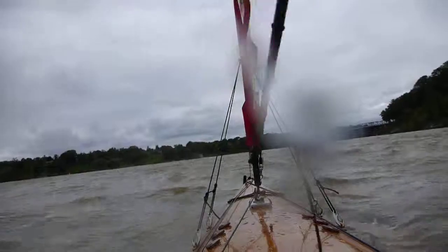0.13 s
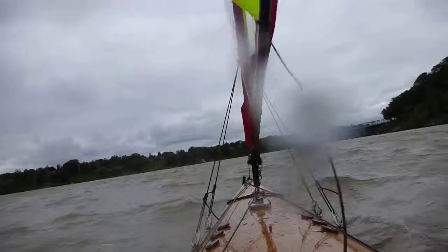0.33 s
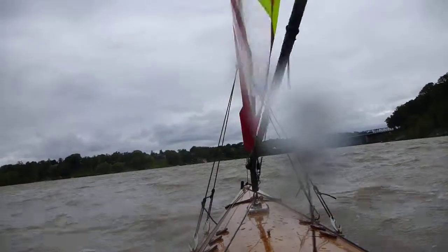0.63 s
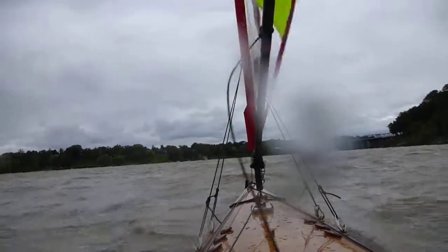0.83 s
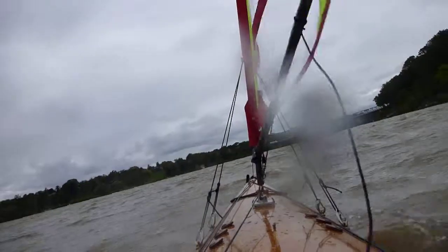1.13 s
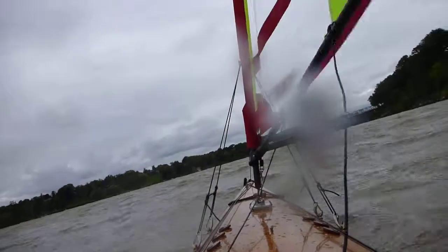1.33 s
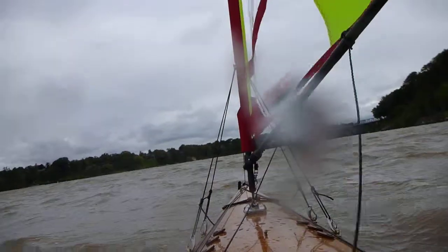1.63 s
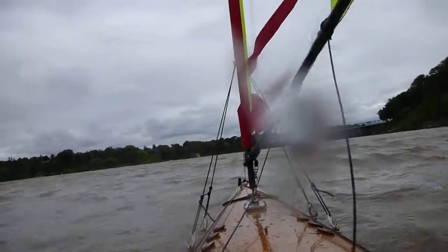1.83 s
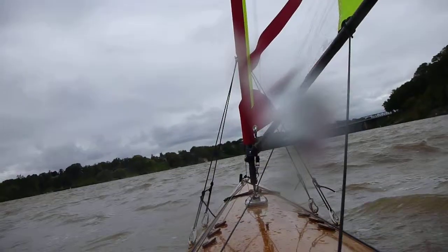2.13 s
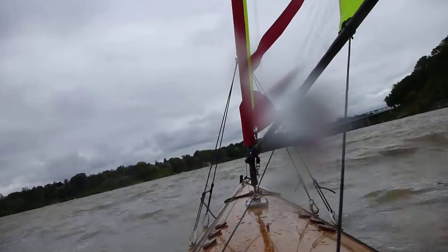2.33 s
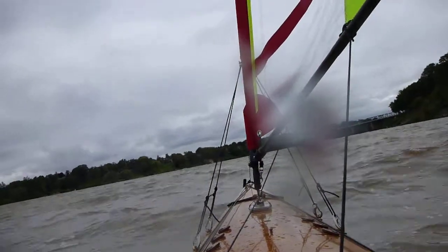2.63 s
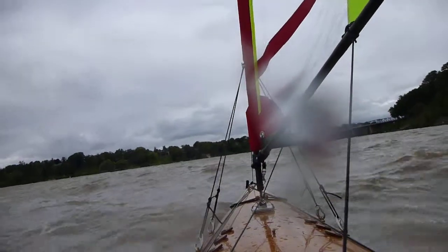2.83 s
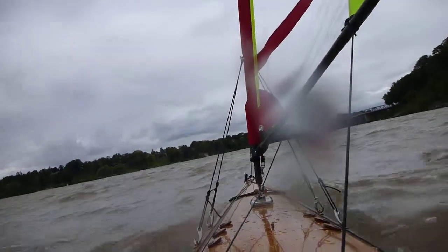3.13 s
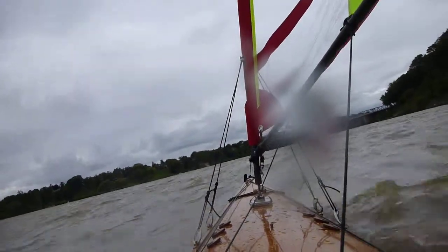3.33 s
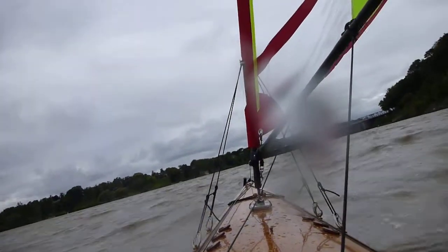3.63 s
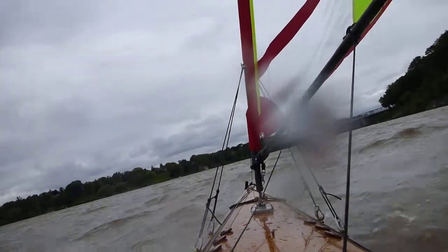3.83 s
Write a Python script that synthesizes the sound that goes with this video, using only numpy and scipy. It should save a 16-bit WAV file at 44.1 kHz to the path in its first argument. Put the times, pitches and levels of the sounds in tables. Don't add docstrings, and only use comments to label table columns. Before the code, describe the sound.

Close, rough wind thumps on a small boat's open microphone, with early sharp cloth flaps from a luffing sail, dull chop on planking and hissing water, ending in a strong sustained gust on a choppy river.

```python
import sys
import numpy as np
from scipy import signal
from scipy.io import wavfile
from scipy.ndimage import uniform_filter1d

SR = 44100
rng = np.random.default_rng(int(sys.argv[2]) if len(sys.argv) > 2 else 0)


def dump_mix(stems):
    frames = np.atleast_2d(stems).T
    limited = np.clip(frames, -1, 1)
    pcm = np.round(limited * 32767).astype(np.int16)
    wavfile.write(sys.argv[1], SR, pcm)


def ratio_of_db(decibels):
    return 10 ** (np.asarray(decibels, float) / 20)


N = 176400


def unit_power(x):
    return x / np.sqrt(np.mean(x ** 2) + 1e-20)


def in_time(rows):
    return np.interp(np.arange(N) / SR, *np.transpose(rows))


def bandpass(x, order, low_hz, high_hz):
    return signal.sosfilt(signal.butter(order, [low_hz, high_hz], "band", fs=SR, output="sos"), x)


def drift(rate_hz):
    step = 20
    r = np.exp(-2 * np.pi * rate_hz * step / SR)
    slow = signal.lfilter([1], [1, -2 * r, r * r], rng.standard_normal(N // step + 2002))
    slow = unit_power(slow[2000:])
    return np.interp(np.arange(N) / step, np.arange(len(slow)), slow)


def swell(start, length, fall_s):
    t = np.arange(N) / SR - start
    rise = np.clip(t / (0.2 * length), 0, 1)
    return rise * np.exp(-np.maximum(t - length, 0) / fall_s)


def grains(per_s, spread_db):
    sizes = ratio_of_db(spread_db * np.minimum(rng.exponential(1, N), 4))
    sizes = sizes * rng.choice([-1, 1], N)
    return unit_power(sizes * (rng.random(N) < per_s / SR))


def bands(source, gain_at, patchy_db, rate_hz):
    edges = 25 * 2 ** np.arange(0, 8.4, 1 / 3)
    out = 0
    for k, (low, high) in enumerate(zip(edges, edges[1:])):
        gain = gain_at(np.sqrt(low * high)) * ratio_of_db(patchy_db * drift(rate_hz))
        out = out + (-1) ** k * bandpass(source, 2, low, high) * gain
    return out


def colour(points):
    hz, db = np.transpose(points)
    return lambda f: ratio_of_db(np.interp(np.log(f), np.log(hz), db))


def hull():
    drum = bandpass(rng.standard_normal(N), 2, 74.4, 260)
    return ratio_of_db(-47 + 3.2 * drift(36)) * unit_power(drum)


# time in seconds, level in dB.
FLOW_LEVEL = [(0, -68.5), (.14, -59), (.3, -49.5), (.5, -74.5), (.54, -64.5), (.62, -58), (.93, -56.5),
              (1.12, -63.5), (1.4, -62), (1.58, -61), (1.635, -67.5), (1.72, -61.5), (1.93, -57),
              (2.61, -56), (2.85, -58.5), (3.11, -65), (3.5, -67), (4, -63)]
# frequency in Hz, density in dB per Hz.
WATER_COLOUR = [(120, -40.5), (200, -29), (309, -29.5), (344, -5.5), (424, -8), (1050, -7), (3710, -23.5),
                (7300, -40.5), (9490, -72), (16100, -120)]


def water():
    level_trim_db, spray_db = 16.5, -17
    drops_per_s, ring_cycles, pitches = 70, 30, 12
    gain_at = colour(WATER_COLOUR)
    rush = bands(rng.standard_normal(N), gain_at, patchy_db=1.8, rate_hz=20)
    rush = rush * ratio_of_db(2.0 * drift(60))
    clicks = grains(drops_per_s, spread_db=3.0)
    dealt = rng.integers(0, pitches, N)
    spray = 0
    for k, hz in enumerate(np.geomspace(1200, 6000, pitches)):
        r = ratio_of_db(-60 * hz / ring_cycles / SR)
        turn = 2 * np.pi * hz / SR
        drops = clicks * (dealt == k) + 1e-18
        ring = signal.lfilter([np.sin(turn)], [1, -2 * r * np.cos(turn), r * r], drops)
        spray = spray + ring * gain_at(hz) * np.sqrt(hz)
    flow = ratio_of_db(in_time(FLOW_LEVEL) + level_trim_db)
    return flow * (unit_power(rush) + ratio_of_db(spray_db) * unit_power(spray))


# crest in seconds, peak in dB, pitch in Hz.
STRONG_EDDIES = [(0.064, -38, 294), (0.221, -38, 645), (0.255, -24.5, 660), (0.481, -17.5, 1120),
                 (0.518, -19.5, 392), (0.53, -27, 353), (0.543, -19, 633), (0.555, -22.5, 347),
                 (0.594, -27, 376), (0.601, -23.5, 398), (0.683, -20.5, 1470), (0.734, -16.5, 1090),
                 (0.74, -14, 1230), (0.771, -17.5, 735), (0.82, -21.5, 417), (0.89, -30, 364),
                 (0.966, -23.5, 320), (1.087, -15.5, 385), (1.094, -14, 596), (1.099, -21, 464),
                 (1.198, -17, 562), (1.205, -14.5, 770), (1.213, -21.5, 540), (1.319, -30, 1580),
                 (1.479, -30, 1000), (1.55, -24.5, 300), (1.605, -24, 420), (1.614, -27, 500),
                 (1.696, -28, 330), (1.94, -33, 400), (1.984, -28, 290), (2.017, -24, 400),
                 (2.027, -15.5, 730), (2.032, -13.5, 550), (2.059, -17, 490), (2.07, -14, 387),
                 (2.151, -6.5, 483), (2.157, -20, 500), (2.185, -11.5, 620), (2.197, -8, 530),
                 (2.215, -14.5, 650), (2.578, -22, 390), (2.595, -22, 720), (2.693, -25, 332),
                 (2.875, -30.5, 318), (2.955, -23, 260), (3.01, -17.5, 340), (3.052, -24, 370)]
# crest in seconds, peak in dB, pitch in Hz.
CLOSING_EDDIES = [(3.153, -25.5, 396), (3.168, -14, 280), (3.203, -11, 440), (3.214, -13, 510),
                  (3.229, -14.5, 556), (3.243, -29, 530), (3.265, -10, 350), (3.288, -11.5, 740),
                  (3.3, -20, 760), (3.31, -9, 754), (3.321, -12, 690), (3.328, -13, 750),
                  (3.343, -6.5, 650), (3.363, -12, 430), (3.38, -11.5, 846), (3.402, -28, 516),
                  (3.409, -20, 493), (3.446, -16, 634), (3.453, -19, 806), (3.481, -9, 750),
                  (3.49, -9.5, 770), (3.522, -19, 870), (3.53, -13.5, 680), (3.546, -10, 700),
                  (3.563, -8.5, 745), (3.584, -21, 610), (3.606, -12, 573), (3.616, -2.5, 604),
                  (3.625, -11, 564), (3.654, -23, 317), (3.68, -14, 375), (3.687, -16.5, 570),
                  (3.695, -22.5, 600), (3.738, -8, 660), (3.75, -12.5, 460), (3.755, -19.5, 480),
                  (3.799, -28, 400), (3.828, -19, 420), (3.865, -19.5, 290), (3.901, -17.5, 316)]


def strong_eddies():
    rise_cycles, fall_cycles = 0.9, 1.3
    edge_db, push_db, push_share = -11, -16.5, 0.35
    rows = [*STRONG_EDDIES, *CLOSING_EDDIES]
    out, t = np.zeros(N + 2000), np.arange(-1000, 1000) / SR
    chance = rng.random((len(rows), 3))
    for (s, db, hz), (phase, edge_phase, ratio) in zip(rows, chance):
        turns = t * hz / np.where(t < 0, rise_cycles, fall_cycles)
        body = np.exp(-turns ** 2) * np.sin(2 * np.pi * (hz * t + phase))
        edge_hz, push_hz = (1.64 + ratio) * hz, push_share * hz
        edge = np.exp(-(2 * turns) ** 2) * np.sin(2 * np.pi * (edge_hz * t + edge_phase))
        push = np.exp(-(push_share * turns) ** 2) * np.sin(2 * np.pi * (push_hz * t + edge_phase))
        eddy = body + ratio_of_db(push_db) * push + ratio_of_db(edge_db) * edge
        out[int(s * SR):][:2000] += ratio_of_db(db) * eddy
    return ratio_of_db(1) * out[1000:N + 1000]


# time in seconds, level in dB.
BREEZE_LEVEL = [(0.0, -85), (0.11, -49), (0.28, -49), (0.65, -37.5), (1.37, -46), (1.9, -49), (2.13, -27.5),
                (2.27, -39.5), (2.46, -38), (3.05, -35), (3.38, -25), (3.69, -27), (3.9, -36.5), (4.0, -25)]
# start in seconds, length in seconds, level in dB, corner in Hz.
GUST_ROWS = [(0.212, 0.007, -25, 700), (0.522, 0.039, -23.5, 556), (0.576, 0.038, -31.5, 583),
             (0.752, 0.05, -26, 556), (0.886, 0.0094, -26, 470), (1.087, 0.034, -20.5, 787),
             (1.119, 0.015, -29, 600), (1.166, 0.065, -33, 500), (1.196, .022, -27.5, 1000),
             (1.593, 0.014, -29.5, 645), (1.929, 0.16, -31.5, 365), (2.011, 0.032, -26, 750),
             (2.035, 0.024, -26, 457), (2.099, 0.064, -20, 690), (2.142, 0.061, -18.5, 746),
             (2.207, 0.053, -27.5, 617), (2.512, 0.053, -30, 434), (2.587, 0.029, -39.5, 910),
             (2.685, 0.086, -29.5, 340), (2.757, 0.12, -41.5, 330), (2.866, 0.15, -29.5, 336),
             (2.992, 0.055, -28, 612), (3.132, 0.13, -27, 520), (3.173, 0.042, -24.5, 980),
             (3.217, 0.099, -24.5, 725), (3.267, 0.1017, -20, 1110), (3.377, 0.086, -21.5, 970),
             (3.419, 0.053, -16, 1270), (3.474, 0.025, -21.5, 1040), (3.5, 0.055, -17, 1070),
             (3.563, 0.024, -15.5, 1160), (3.58, 0.049, -20.5, 1110), (3.679, 0.038, -22.5, 900),
             (3.723, 0.033, -27.5, 1000), (3.63, 0.046, -26, 510), (3.747, 0.082, -25.5, 620),
             (3.815, 0.092, -31.5, 574), (3.874, 0.052, -36, 550)]


def wind():
    slope, low_share = 3.28, 0.42
    power = ratio_of_db(2 * (in_time(BREEZE_LEVEL) - 1))
    corner = power * 300
    for s, length, db, hz in GUST_ROWS:
        gust = (ratio_of_db(db) * swell(s, length, fall_s=0.006)) ** 2
        power = power + gust
        corner = corner + gust * hz
    strong = strong_eddies()
    strong_power = uniform_filter1d(strong ** 2, size=200).clip(0)
    crest = np.tanh(np.sqrt(strong_power / power))
    corner = corner / power * ratio_of_db(2.5 * (crest - 0.35) + 0.63 * drift(81))
    power = power * ratio_of_db(2 * 4 * (crest - 0.4259))
    lumps = ratio_of_db(0.8 * drift(35) + 1.2 * drift(110))
    eddies = unit_power(0.6 * grains(900, spread_db=2.5) + rng.standard_normal(N))

    def gust_shape(f):
        highs = 1 + (f / corner) ** (2 * slope)
        lows = 1 + (low_share * corner / f) ** 3.5
        return np.sqrt(SR / 2 / corner / highs / lows)

    buffet = bands(eddies, gust_shape, patchy_db=-2.0, rate_hz=6.7)
    buffet = np.sqrt(power) * unit_power(lumps) * buffet
    return bandpass(buffet + strong, 3, 94.5, 3240)


# start in seconds, length in seconds, level in dB.
SHAKE_ROWS = [(0.083, .03, -38.5), (0.159, 0.16, -35), (0.293, 0.21, -30.5), (0.31, 0.017, -33),
              (0.353, 0.0098, -28), (0.461, 0.027, -24), (.49, .026, -30.5), (0.575, 0.019, -41.5),
              (0.62, 0.091, -38), (0.65, .005, -44.5), (0.682, 0.024, -24), (0.719, 0.03, -16),
              (0.756, 0.037, -30), (0.832, 0.11, -40), (0.952, 0.06, -48), (1.012, 0.041, -40),
              (1.056, 0.035, -34.5), (1.144, 0.018, -38), (1.227, 0.09, -47.5), (1.314, 0.004, -36.5),
              (1.339, 0.025, -37), (1.416, 0.039, -38.5), (1.461, 0.017, -34.5), (1.545, 0.0065, -41.5),
              (1.498, 0.052, -37.5), (1.724, 0.19, -43), (2.25, 0.06, -41.5), (2.594, 0.0082, -42.5)]
# frequency in Hz, density in dB per Hz.
CLOTH_COLOUR = [(250, -10), (450, -3.5), (800, -9.5), (1300, 0.5), (1750, -11), (2250, -4.5), (3000, -15.5),
                (7300, -37)]


def sail():
    power = 0
    for s, length, db in SHAKE_ROWS:
        power = power + (ratio_of_db(db) * swell(s, length, fall_s=0.008)) ** 2
    creases = unit_power(0.6 * grains(2500, spread_db=4.0) + rng.standard_normal(N))
    cloth = bands(creases, colour(CLOTH_COLOUR), patchy_db=0.8, rate_hz=40)
    cloth = cloth * ratio_of_db(1.8 * drift(60))
    return np.sqrt(power) * unit_power(cloth)


# time in seconds, peak in dB, pitch in Hz.
SNAP_ROWS = [(0.0918, -60, 4160), (0.382, -44, 4350), (0.4688, -16, 4220), (0.591, -37, 4260),
             (.653, -25.5, 3800), (0.6828, -27, 4330), (.711, -29, 4200), (.74, -23.5, 4370),
             (0.7244, -12, 3870), (0.9183, -32.5, 3700), (1.1922, -48, 4370), (1.2032, -35, 4200),
             (1.3164, -31, 4400), (1.3453, -38.5, 4620), (1.5078, -47.5, 4400), (1.6088, -39, 4600),
             (1.7722, -49, 3900), (2.0924, -47, 4380), (2.17, -36, 4160), (2.4879, -37.5, 3800),
             (2.5551, -44, 3810), (2.7855, -50, 3900), (3.2866, -44, 3600), (3.325, -43, 3700),
             (3.3807, -45, 3850), (3.453, -34, 4000), (3.517, -47, 3700), (3.566, -48.5, 3800),
             (3.6124, -41.5, 3800), (3.625, -46, 4200), (3.7479, -40, 4300), (3.758, -51, 5300),
             (3.7938, -36, 5100)]


def snaps():
    out, t = np.zeros(N + 2000), np.arange(2000) / SR
    for s, db, hz in SNAP_ROWS:
        ring = np.sin(2 * np.pi * hz * t) + rng.standard_normal(2000)
        out[int(s * SR):][:2000] += ratio_of_db(db - 60 * t * hz / 11) * ring
    return out[:N]


def scene():
    return (hull() + water() + wind() + sail() + snaps())[None]


def low_pass(x):
    return signal.sosfilt(signal.butter(12, 7480, fs=SR, output="sos"), x)


def record(dry):
    duck_from_db, duck_share, recover_db_per_s = -32, 0.22, 120.5
    overload, start_s = 0.6, 0.035
    x = signal.lfilter(*signal.iirnotch(2890, 9, SR), dry[0])
    level_db = 10 * np.log10(uniform_filter1d(x ** 2, size=441) + 1e-12)
    over_db = np.maximum(level_db - duck_from_db, 0)
    ramp = recover_db_per_s * np.arange(N) / SR
    duck_db = np.maximum.accumulate(duck_share * over_db + ramp) - ramp
    duck_db = uniform_filter1d(duck_db, size=221)
    x = overload * np.tanh(x * ratio_of_db(-duck_db) / overload)
    x = signal.sosfilt(signal.butter(8, 6160, fs=SR, output="sos"), x)
    x = signal.sosfilt(signal.butter(2, 57, "high", fs=SR, output="sos"), x)
    started = np.arange(N) > start_s * SR
    return low_pass((x * started)[None])


dry = scene()
out = record(dry)
dump_mix(out)
```